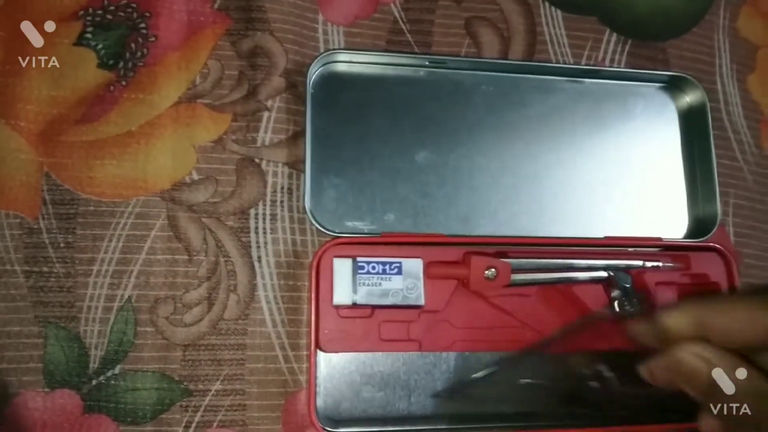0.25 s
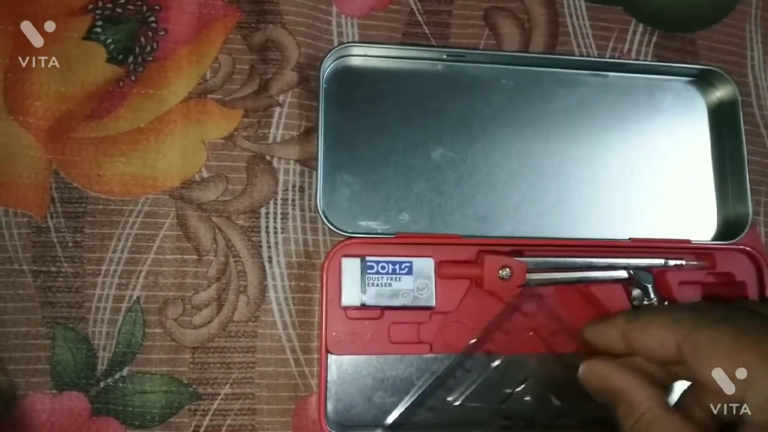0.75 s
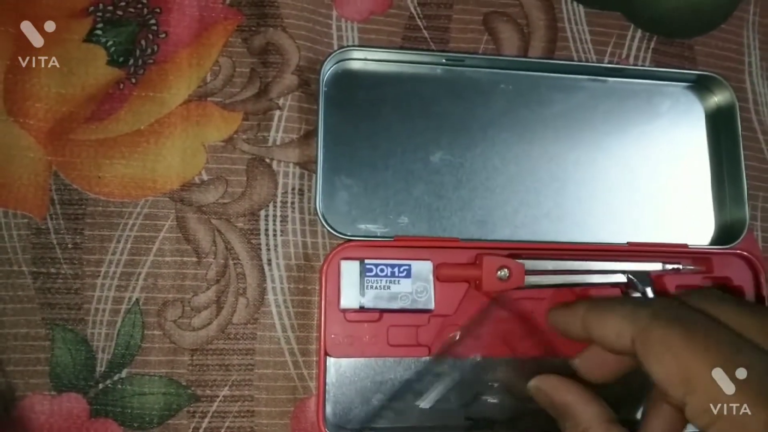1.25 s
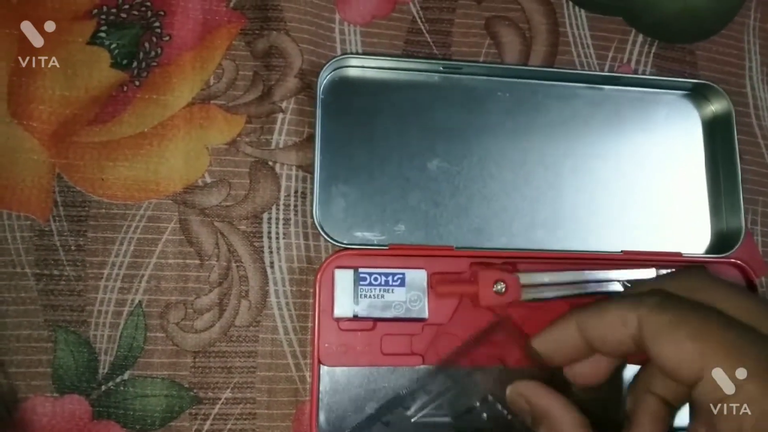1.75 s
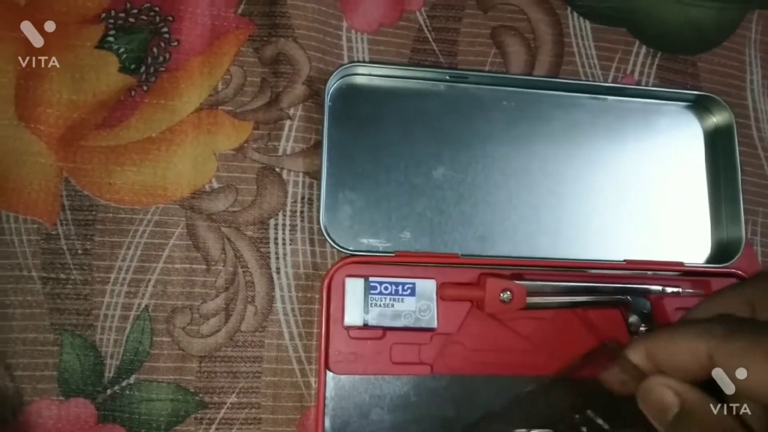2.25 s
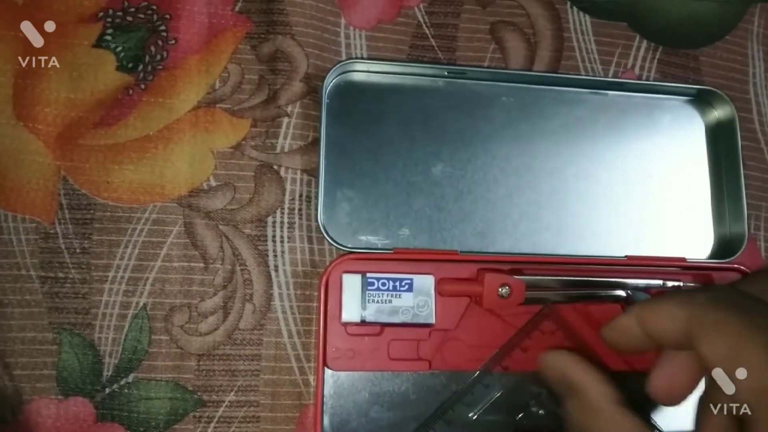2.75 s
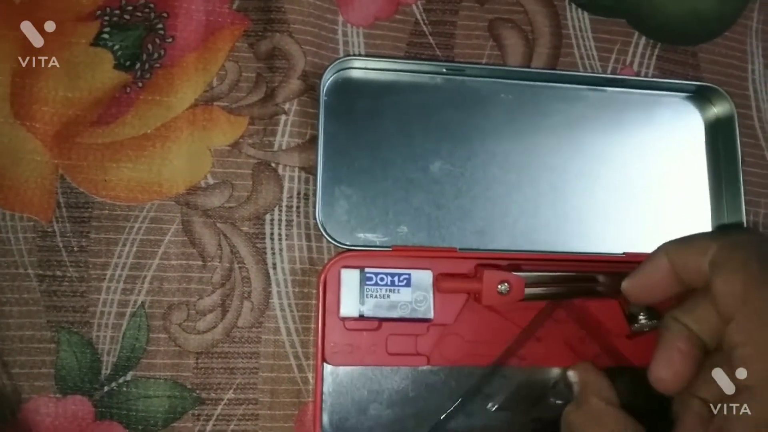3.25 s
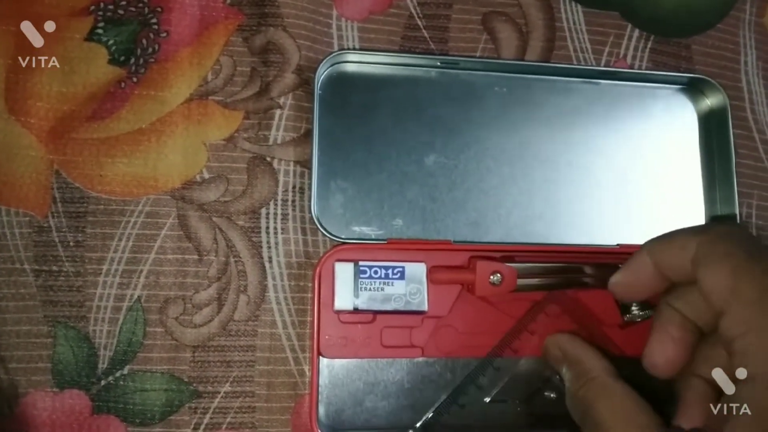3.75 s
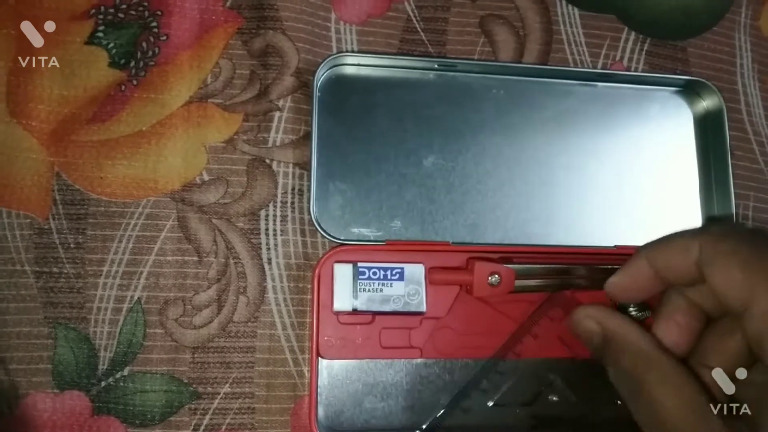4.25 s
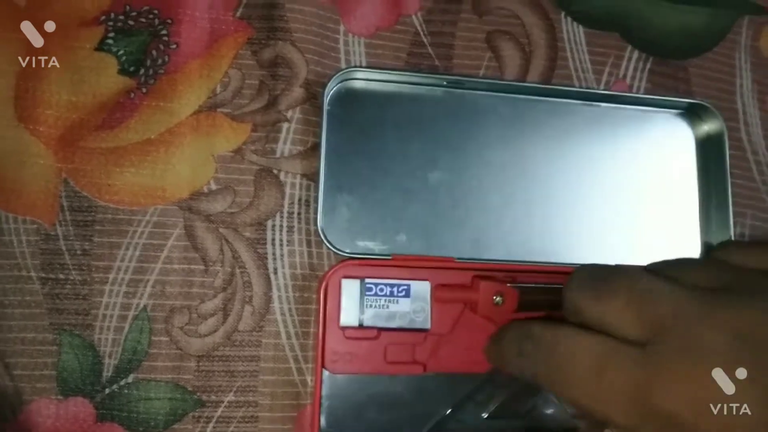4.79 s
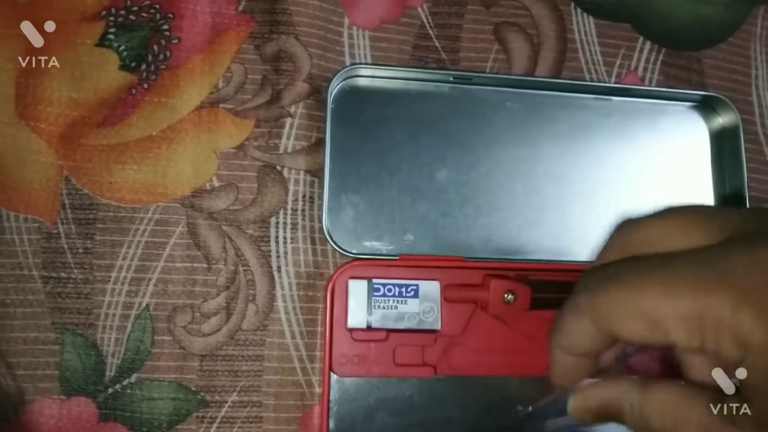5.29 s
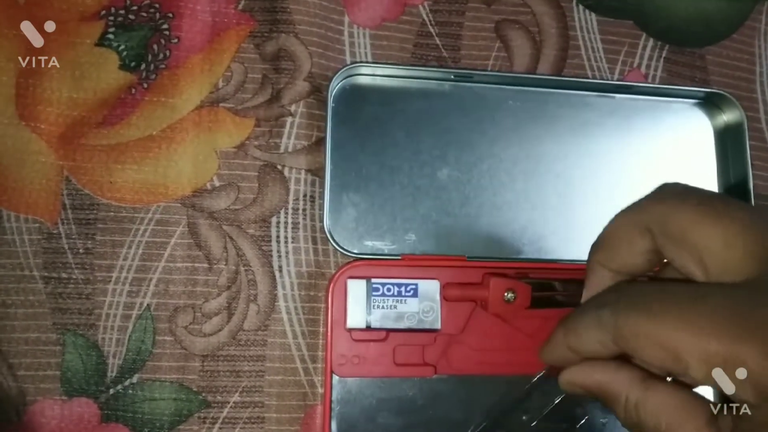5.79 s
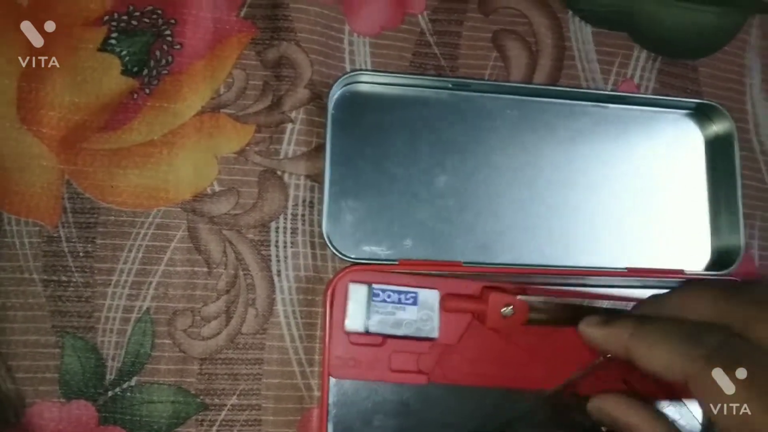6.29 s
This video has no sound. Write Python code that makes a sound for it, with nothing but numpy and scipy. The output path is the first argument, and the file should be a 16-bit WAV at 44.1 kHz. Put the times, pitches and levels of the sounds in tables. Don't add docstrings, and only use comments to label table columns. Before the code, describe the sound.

Close up in a small room, hands fit plastic and steel drawing tools into a plastic tray inside a tin case. Sparse clicks and scrapes come first, then brighter metallic snaps and a brief ringing rattle around two and a half seconds. Further sharp clacks, taps and dragging follow in uneven clusters, fading to light slides. A low fan hum stays underneath, and the high hiss drops away between contacts.

```python
import sys
import numpy as np
from scipy import signal
from scipy.fft import rfft, irfft, next_fast_len
from scipy.io import wavfile
from scipy.ndimage import uniform_filter1d, map_coordinates

SR = 44100
rng = np.random.default_rng(int(sys.argv[2]) if len(sys.argv) > 2 else 0)


def volts_from_db(level):
    exponent = np.asarray(level, float) / 20
    return 10 ** exponent


def output_pcm(signal):
    pcm = np.clip(np.atleast_2d(signal).T, -1, 1) * 32767
    wavfile.write(sys.argv[1], SR, np.round(pcm).astype(np.int16))


N = 287973

# [f/Hz, width/Hz, level/dB]
PLASTIC_MODES = [(1535, 420, 0.5), (1726, 504, -1), (2288, 520, -1.5), (2563, 490, 0), (2980, 370, -0.5),
                 (3360, 630, 1.5), (4115, 1760, -3.5)]
# [f/Hz, width/Hz, level/dB]
STEEL_MODES = [(5350, 810, -8), (5900, 400, -2), (6420, 360, -2), (7537, 670, -1.5), (7580, 790, -7),
               (8450, 410, -12.5), (9830, 880, -12.5), (10630, 530, -13.5), (12150, 850, -27.5),
               (13700, 8300, -27), (15400, 230, -21.5)]
# [f/Hz, likeness/0-1]
PORT_LIKENESS = [(30, 0.11), (70, 1), (300, .93), (600, 0.6), (1200, 0.1), (16000, 0.5)]


def unit(x):
    return x / np.sqrt(np.mean(x ** 2) + 1e-20)


def along(points, hz):
    f, v = np.transpose(points)
    return np.interp(np.log(hz + 1), np.log(f + 1), v)


def curves(rows):
    s, *cols = np.transpose(rows)
    return [np.interp(np.arange(N) / SR, s, c) for c in cols]


def wobble(rate_hz):
    knots = rng.standard_normal(int(N * rate_hz / SR) + 4)
    return map_coordinates(knots, [np.arange(N) * rate_hz / SR])


def filtered(x, response):
    n = x.shape[-1]
    m = next_fast_len(n + 2048)
    return irfft(rfft(x, m) * response(np.fft.rfftfreq(m, 1 / SR)), m)[..., :n]


def modes(table, hz, scatter_db=0, detune=1):
    c, w, db = np.transpose(table)[..., None]
    c = c * np.reshape(detune, (-1, 1))
    sign = (-1) ** np.arange(len(table))[:, None]
    strength = sign * volts_from_db(db + np.reshape(scatter_db, (-1, 1)))
    return np.sum(strength * 1j * hz * w / (c * c - hz * hz + 1j * hz * w), axis=0)


def pair(gain):
    def spread(hz):
        turn = np.arccos(np.clip(along(PORT_LIKENESS, hz), 0, 1)) / 2
        return gain(hz) * [np.cos(turn), np.sin(turn)]

    mid, side = filtered(rng.standard_normal((2, N)), spread)
    return unit(np.array([mid + side, mid - side]))


def background():
    # [t/s, rumble/dB, drone/dB]
    fan = [(0.0, -56, -78), (0.54, -51, -74), (1.85, -55.5, -63.5), (1.95, -45, -84), (2.07, -67.5, -67),
           (2.27, -49.5, -77), (2.8, -55.5, -67), (3.07, -53.5, -57), (3.82, -61, -62.5),
           (5.15, -49.5, -59), (5.2, -63.5, -61), (5.31, -57.5, -82), (5.58, -61.5, -61.5),
           (5.67, -45.5, -69), (6.05, -56, -68.5), (6.33, -52, -62), (6.49, -61, -69), (6.53, -64.5, -56.5)]
    # [f/Hz, width/Hz, level/dB]
    fan_orders = [(97.2, 7.3, 3.5), (79, 16, -6.5), (130.3, 4.2, -2.5), (192.9, 3.5, -9.5)]
    # [f/Hz, width/Hz, level/dB]
    drone_modes = [(246, 38, 2.5), (306, 37, 2), (370.8, 11, -11.5), (500.4, 7, -17), (663, 25, -19)]
    # [f/Hz, density/dB per Hz]
    air_density = [(12, -22), (20, 9), (70, -3.5), (151, -9.5), (297, -25.5), (404, -27), (863, -36.5),
                   (1690, -37), (2310, -32), (3060, -32), (4660, -35), (7300, -38), (15200, -63.5),
                   (16500, -64.5)]
    # [t/s, level/dB]
    pipe = [(0, -100), (4.05, -100), (4.15, -66), (4.9, -65.5), (5.85, -67.5), (6.05, -64.5), (6.25, -88.5)]

    rumble_db, drone_db = curves(fan)
    hum = volts_from_db(rumble_db + 3.0 + 1.3 * wobble(3.7)) * pair(lambda hz: modes(fan_orders, hz))
    drone = volts_from_db(drone_db + 3.0) * pair(lambda hz: modes(drone_modes, hz))
    air = volts_from_db(-48.0) * pair(lambda hz: volts_from_db(along(air_density, hz)))

    whine_hz = 3152 + 4 * wobble(3)
    whine = volts_from_db(curves(pipe)[0] + 1.6 * wobble(5.5)) * np.sin(2 * np.pi * np.cumsum(whine_hz) / SR)
    whine = whine * volts_from_db([[2], [-4]]) * [[1], [-1]]

    flicker = volts_from_db(2.1 * wobble(400) + 3.3 * wobble(25))
    skin = pair(lambda hz: modes(PLASTIC_MODES, hz) + modes(STEEL_MODES, hz))
    rustle = volts_from_db(-74.0) * unit(flicker * skin)
    return hum + drone + air + rustle + whine


def contacts(rows, grain_db, blow, scatter_db, own, focus_db):
    # [from t/s, plastic tilt/dB per octave, thud/dB, steel tilt/dB per octave, left over right/dB]
    grips = [(0, -14, -4, 15, -1), (.33, 0, 5.5, 0.5, 2.5), (.41, -2, 2, 3, -2), (.67, 2, 0, -12, 11),
             (.78, -4, 7, -4, 1.5), (.9, 4, -2, 7, 0), (1.25, -5.5, 2, -19, 1.5), (1.46, -3, 4.5, -4, 3.5),
             (1.6, -1.5, 2, -2, 0.5), (1.7, 10, -10, -9, 1), (1.74, -7.5, 1, -5, 3), (1.78, 0, 2, -4, -1),
             (1.84, 2, -2.5, -2, 1.5), (1.99, -11, 4.5, -9, 2), (2.17, 3.5, 6, 5.5, -1),
             (2.32, 5.5, -6.5, -9, -0.5), (2.42, 7, -1, -8, -1), (2.485, 2.5, 0, 8.5, 1),
             (2.76, 4.5, 5, -8, 4), (2.93, 0, -4.5, -10, 1), (3.02, 5, -4, -7, -1), (3.045, -13, 1.5, 4, 1),
             (3.15, -9, 1.5, -2, 1), (3.28, -5, 3, 6, 1.5), (3.43, -1.5, -6.5, -12, 5),
             (3.67, -6.5, 0, -9, 1.5), (3.8, 2.5, 1, 6.5, 0.5), (4.07, -11, 3, -7.5, 1.5),
             (4.24, 2.5, -4, 2, -0.5), (4.43, 5, -1.5, -3, 2), (4.495, -1.5, 0, -4.5, 1),
             (4.64, 2.5, 4, 7, -0.5), (4.71, 2, 3.5, 5, 1), (4.92, -7, -2, -11, 2),
             (5.075, 11, -0.5, 0, -0.5), (5.21, 4.5, -1.5, 3, 2), (5.49, 4, 0.5, 2, 1),
             (5.69, 5, -0.5, -7, 1.5), (6.1, 2, 1.5, 1.5, 3), (6.38, 2.5, -5, -2, 6)]
    # [f/Hz, width/Hz, level/dB]
    tray_modes = [(160, 95, -2), (208.4, 39, 5), (306, 61, 1.5), (373, 180, 0), (516, 270, -2),
                  (650, 210, -3), (920, 270, -2), (999, 190, -2.5)]
    # [f/Hz, width/Hz, level/dB]
    leg_modes = [(7800, 97, 10), (8700, 44, 9), (9900, 99, -9.5)]
    # [from t/s, to t/s]
    legs_free = (2.495, 2.56)

    size = SR // 5
    out, t = np.zeros((2, N + size)), np.arange(size) / SR
    for s, db, thud_db, steel_db, t60, pitch_hz, rise_ms in rows:
        tilt_db, body_db, edge_db, pan_db = [grip[1:] for grip in grips if grip[0] <= s + .004][-1]
        chance = rng.standard_normal((5, size))

        rise = max(rise_ms, .2) / 1000
        swell = volts_from_db(-14 * (0.5 - t / rise)) * np.minimum(t / (0.0011 + 0.44 * rise), 1)
        chatter = volts_from_db(-60 * (t - rise) / max(t60, .01))
        dying = chatter + blow * volts_from_db(-60 * (t - rise) / 0.0012)
        fine = grain_db * unit(uniform_filter1d(chance[0], size=35))
        coarse = 0.43 * unit(uniform_filter1d(chance[0, ::-1], size=260))
        impacts = chance[1:4] * np.abs(chance[1:4]) ** .7
        force = np.where(t < rise, swell, dying) * volts_from_db(fine + coarse) * impacts
        spread = force[0] + own * force[1:]

        luck_db, detune = scatter_db * chance[4], 1 + 0.037 * chance[4, ::-1]

        def ring(x, table, table_db, k):
            last = k + len(table)

            def response(hz):
                rolloff = (1 + 1j * hz / (1.76 * table[-1][0])) ** 2
                return modes(table, hz, table_db + luck_db[k:last], detune[k:last]) / rolloff

            return filtered(x, response)

        octaves = np.log2(np.transpose(PLASTIC_MODES)[0] / pitch_hz)
        near_db = tilt_db * octaves - focus_db * octaves ** 2
        sheen_db = edge_db * np.log2(np.transpose(STEEL_MODES)[0] / 7000)
        legs_db = 0 if legs_free[0] < s < legs_free[1] else -27
        legs = filtered(spread, lambda hz: modes(leg_modes, hz, legs_db))
        plastic = ring(spread, PLASTIC_MODES, near_db, k=0)
        steel = ring(spread, STEEL_MODES, sheen_db, k=20) + legs

        soft = volts_from_db(-60 * np.maximum(t - rise, 0) / 0.31)
        shared = force[0] + .13 * force[1:]
        tray = ring(shared * soft, tray_modes, 0, k=40)

        top = lambda x: np.sqrt(uniform_filter1d(np.mean(x ** 2, 0), size=110).max())
        click = plastic / top(plastic) + volts_from_db(steel_db - 3.5) * steel / top(steel)
        click = volts_from_db([[pan_db / 2], [-pan_db / 2]]) * click / top(click)
        thud = volts_from_db(thud_db + body_db + 3.0) * tray / top(tray)
        out[:, round(s * SR):][:, :size] += volts_from_db(db) * (click + thud)
    return out[:, :N]


def blows(table, thud_db, plastic_hz, octaves_per_db):
    rows = [(s, db, thud_db, steel_db, t60, plastic_hz * 2 ** (octaves_per_db * steel_db), 1.1)
            for s, db, t60, steel_db in table]
    return contacts(rows, grain_db=2.5, blow=0.11, scatter_db=2.0, own=1.0, focus_db=6.0)


def scuffs(table, thud_db, steel_db):
    rows = [(s, db, thud_db, steel_db, t60, 2600, rise_ms) for s, db, t60, rise_ms in table]
    return contacts(rows, grain_db=3.0, blow=.1, scatter_db=2.0, own=0.87, focus_db=5.5)


def ticks():
    # [t/s, level/dB, chatter t60/s, steel over plastic/dB]
    tick_table = [(.0005, -41.5, 0.0043, -5), (1.677, -59, 0.025, -4), (2.004, -52, 0.018, -8.5),
                  (2.884, -51.5, .015, -3), (2.986, -39, .02, 11.5), (3.081, -39, 0.042, 1),
                  (5.023, -47, 0.017, -13), (4.458, -42.5, 0.033, -1), (4.583, -47, 0.013, -4)]
    rows = [(s, db, -12, steel_db, t60, 2500, .4) for s, db, t60, steel_db in tick_table]
    return contacts(rows, grain_db=-1, blow=.5, scatter_db=4.5, own=.8, focus_db=9)


def rings():
    # [t/s, peak/dB, f/Hz, t60/s]
    pings = [(0.3476, -31, 3750, 0.02), (0.3508, -26.5, 3040, 0.02), (0.3583, -43, 5340, 0.016),
             (0.3626, -37, 7600, 0.039), (0.9635, -25, 9930, 0.02), (0.9635, -26, 4000, 0.017),
             (0.9642, -29, 8110, 0.023), (0.9654, -25.5, 6460, 0.03), (1.7718, -34, 4900, 0.016),
             (1.7907, -28, 3200, 0.045), (1.7907, -24, 7400, 0.015), (1.792, -24, 1300, 0.037),
             (1.9264, -32, 860, 0.023), (1.9264, -32, 3600, 0.018), (2.22, -34, 2970, 0.016),
             (2.2225, -38, 5930, 0.045), (2.3451, -14, 6630, 0.018), (2.3458, -22, 5100, 0.03),
             (2.3467, -22, 2930, 0.02), (2.4924, -27, 3570, 0.016), (2.512, -21, 7330, 0.023),
             (2.5308, -24, 7250, 0.045), (2.5374, -37.5, 6530, 0.05), (2.9687, -37, 5810, 0.016),
             (2.987, -36, 7000, 0.016), (3.0511, -23.5, 460, 0.015), (3.0598, -37, 6200, 0.018),
             (3.3152, -34, 2230, 0.016), (3.3165, -31.5, 3310, 0.019), (3.7187, -42.5, 2880, 0.016),
             (4.103, -36.5, 7110, 0.016), (4.256, -26, 7050, 0.03), (4.289, -29, 5730, 0.016),
             (4.5048, -33, 1450, 0.042), (4.5227, -24, 880, 0.017), (4.6562, -36.5, 1715, 0.042),
             (4.6569, -36, 3540, 0.016), (5.0009, -40, 6400, 0.016), (5.0074, -41, 6800, 0.03),
             (5.0099, -35, 1720, 0.045), (5.1077, -23, 3360, 0.021), (5.1083, -26, 6130, 0.018),
             (5.1107, -24, 3970, 0.019), (5.1105, -26.5, 5500, 0.037), (5.2299, -34, 3150, 0.045),
             (5.2599, -34, 5270, 0.031), (5.5184, -44, 3210, 0.02), (6.1816, -48, 7220, 0.03),
             (6.2381, -49, 9280, 0.016), (6.2577, -40, 5570, 0.045)]
    # [t/s, peak/dB, centre f/Hz]
    cracks = [(.4315, -36, 700), (1.7452, -25.5, 1500), (1.766, -19, 2500), (1.7696, -19, 1200),
              (1.91, -27, 3000), (1.9268, -27, 1980), (2.2218, -27.5, 1510), (2.492, -15.5, 2500),
              (3.051, -11, 2500), (3.308, -32.5, 400), (3.7195, -29, 1186), (3.813, -34, 1815),
              (4.105, -28.5, 2500), (4.449, -31, 1500), (4.5053, -18, 2970), (4.523, -24, 1500),
              (4.658, -26, 3000), (4.7205, -29, 2500), (5.1085, -16, 4000), (5.1109, -17.5, 1980),
              (5.23, -27, 2000), (5.516, -36, 2480), (5.708, -37, 1203), (6.2362, -28, 3000)]
    # [f/Hz, lead/rad]
    port_lead = [(200, 0), (1500, .3), (3150, 1.9), (4700, 3.5), (6300, 5.1), (6880, 5.1), (6900, 7.8)]
    ping_rise_s, crack_cycles = .0004, 2.5

    rows = [(*row, ping_rise_s) for row in pings]
    rows += [(s, db, hz, crack_cycles / hz, 1 / SR) for s, db, hz in cracks]
    out, t = np.zeros((2, N + SR)), np.arange(SR // 10) / SR
    for s, db, hz, t60, rise_s in rows:
        phase = 2 * np.pi * hz * t + np.array([[0], [along(port_lead, hz)]])
        decay = volts_from_db(db - 60 * t / max(t60, 1 / SR))
        out[:, round(s * SR):][:, :len(t)] += decay * np.sin(phase) * (1 - np.exp(-t / rise_s))
    return out[:, :N]


def clicks():
    # [t/s, level/dB, chatter t60/s, steel over plastic/dB]
    click_table = [(0.3489, -31, 0.055, -3), (0.9636, -24, 0.062, 9), (1.7902, -18, 0.014, -3.5),
                   (2.1803, -52.5, 0.79, -8), (2.2195, -31, 0.066, 1), (2.3275, -31, 0.17, -1),
                   (2.3342, -41.5, 0.072, 1), (2.3447, -14.5, 0.024, 11), (2.3505, -27, 0.016, 11.5),
                   (2.4915, -18, 0.01, 11), (2.4985, -29, 0.023, 10), (2.5131, -29.5, 0.096, 10),
                   (2.5299, -24, 0.051, 9.5), (2.5435, -29, 0.084, 8), (3.0501, -17.5, 0.045, 7),
                   (3.1671, -48.5, 0.25, 0.5), (3.3151, -29.5, 0.053, 3), (3.7173, -32.5, 0.026, -1.5),
                   (3.8121, -33.5, 0.047, 0.5), (4.249, -22.5, 0.13, 4), (4.278, -28, 0.058, 2),
                   (4.6558, -30.5, 0.12, -0.5), (5.24, -31, 0.063, -6.5), (6.2357, -31, 0.17, 0),
                   (6.527, -32.5, 0.027, -6)]
    return blows(click_table, thud_db=-20.5, plastic_hz=3070, octaves_per_db=0.0033)


def scrapes():
    # [t/s, level/dB, chatter t60/s, rise/ms]
    scrape_table = [(0.3565, -47, 0.22, 8), (0.362, -34.5, 0.097, 20.5), (2.2041, -39.5, 0.18, 16.3),
                    (2.4381, -44, 0.12, 13), (2.5522, -47, 0.015, 9.1), (2.5883, -68, 0.19, 4),
                    (2.8415, -45, 0.15, 24), (2.9543, -39, 0.23, 20), (2.9768, -41.5, 0.057, 23),
                    (3.1868, -48, 0.048, 10), (3.8183, -36, 0.11, 9.3), (4.3216, -65, 0.16, 14),
                    (4.449, -42.5, 0.095, 9.9), (5.139, -52, 1, 20), (5.6466, -53.5, 0.15, 7.9),
                    (5.762, -41.5, 0.081, 35), (6.169, -43.5, 0.18, 7.7), (6.2165, -56, 0.12, 8.1),
                    (6.495, -32.5, 0.29, 71)]
    return scuffs(scrape_table, thud_db=-16, steel_db=2.5)


def drags():
    # [t/s, level/dB, chatter t60/s, rise/ms]
    drag_table = [(0.416, -49, 0.076, 13), (0.543, -66, 0.12, 6), (1.265, -46.5, 0.25, 13.5),
                  (1.6495, -51.5, 0.18, 15.5), (1.6844, -49, 0.12, 22), (2.0021, -56.5, 0.045, 7.4),
                  (2.0598, -58.5, 0.0077, 3.6), (2.0698, -53, 0.0081, 20), (3.0308, -41, 0.35, 3),
                  (4.1411, -60, 0.45, 13), (4.7793, -69, 0.065, 4.9), (5.0515, -45.5, 0.78, 8.6),
                  (5.7132, -57.5, 0.81, 11), (6.1197, -60, 0.098, 7), (6.3161, -50, 0.053, 25)]
    return scuffs(drag_table, thud_db=0.35, steel_db=-9)


def taps():
    # [t/s, level/dB, chatter t60/s, steel over plastic/dB]
    tap_table = [(0.685, -59.5, 0.023, 19), (0.8075, -49, 0.12, -9.5), (0.816, -54, 0.1, -1),
                 (1.619, -45, 0.093, 0), (1.7111, -50, 0.085, -0.5), (1.7273, -44, 0.082, -4),
                 (1.7462, -36, 0.04, -11.5), (1.7977, -28.5, 0.055, -12.5), (1.9094, -36, 0.088, -6),
                 (1.9276, -36.5, 0.15, -5), (2.9485, -32, 0.032, 1.5), (3.2897, -36, 0.061, -6),
                 (4.1035, -33.5, 0.13, -2.5), (4.1344, -42, 0.057, -42), (4.5057, -27.5, 0.027, 3),
                 (4.521, -30.5, 0.11, -5), (4.7215, -39, 0.083, 1.5), (4.7747, -40.5, 0.0077, -39),
                 (4.9545, -47, 0.026, -34), (4.998, -37, 0.18, -12), (5.0834, -42.5, 0.029, -14.5),
                 (5.108, -24.5, 0.035, 4), (5.23, -33.5, 0.17, -3.5), (5.2611, -34, 0.036, -10),
                 (5.5155, -42.5, 0.21, -2), (5.5618, -39.5, 0.086, -11), (5.6679, -47, 0.048, -3),
                 (6.2984, -39.5, 0.2, -9)]
    return blows(tap_table, thud_db=-9, plastic_hz=2430, octaves_per_db=0.022)


def knocks():
    # [t/s, level/dB, chatter t60/s, steel over plastic/dB]
    knock_table = [(0.794, -49.5, 0.1, -11.5), (1.291, -37.5, 0.044, -1), (1.4754, -63, 0.21, -3),
                   (1.5032, -54, 0.045, -25), (1.6728, -52.5, 0.28, -19), (1.7653, -26.5, 0.17, -4),
                   (3.4435, -37.5, 0.017, 3), (4.4476, -40.5, 0.15, -10), (4.9323, -46, 0.044, -3),
                   (4.9783, -49, 0.29, -8), (4.9893, -42.5, 0.18, -4), (5.7061, -47, 0.018, -13),
                   (5.9082, -58, 0.03, -5.5), (6.3942, -54.5, 0.045, 3.5)]
    return blows(knock_table, thud_db=-2.1, plastic_hz=2900, octaves_per_db=.015)


def slides():
    # [t/s, level/dB, chatter t60/s, rise/ms]
    slide_table = [(0.915, -47, 0.5, 29), (0.95, -38, 0.15, 8.7), (1.8496, -42, 0.67, 23.5),
                   (1.8783, -39.5, 0.26, 31.5), (2.2634, -52, 0.08, 17), (2.8156, -43.5, 0.24, 11.9),
                   (2.8722, -46.5, 0.047, 12), (3.2086, -52.5, 1, 4.9), (3.449, -51, 0.064, 8.3),
                   (3.461, -49, 0.059, 3.7), (3.7282, -36, 0.11, 13), (4.5682, -51, 0.32, 13),
                   (4.7373, -42.5, 0.13, 9.4), (5.0023, -41, 0.055, 23), (5.0164, -33.5, 0.084, 9.6),
                   (5.3676, -70, 0.27, 12), (5.4572, -61, 0.23, 17), (6.1868, -43.5, 0.11, 15.5),
                   (6.2794, -43, 0.15, 29)]
    return scuffs(slide_table, thud_db=-9, steel_db=-5)


def bumps():
    # [t/s, level/dB, chatter t60/s]
    bump_table = [(1.582, -78, 0.042), (2.7777, -58.5, 0.038), (3.2472, -60, 0.032), (3.681, -70, 0.022),
                  (3.7068, -50.5, 0.3), (4.088, -56, 0.4), (6.21, -50, 0.22)]
    steel_db = -2
    rows = [(*row, steel_db) for row in bump_table]
    return blows(rows, thud_db=7.6, plastic_hz=2200, octaves_per_db=.01)


def room(x):
    # [f/Hz, t60/s]
    decay_t60 = [(200, 0.14), (2000, 0.19), (7000, 0.15), (14000, 0.26)]
    out = np.zeros((2, N))
    for k in range(3):
        hz, t, z = signal.stft(rng.standard_normal((2, SR // 3)), SR, nperseg=256)
        alike = np.clip(along(PORT_LIKENESS, hz), 0, 1)[:, None]
        z[1] = alike * z[0] + np.sqrt(1 - alike ** 2) * z[1]
        tail = signal.istft(z * volts_from_db(-60 * t / along(decay_t60, hz)[:, None]), SR, nperseg=256)[1]
        tail = tail / np.linalg.norm(tail[0])
        turn = np.arange(N) * 5 // SR % 3 == k
        late = np.pad(x * turn, ((0, 0), (200, 0)))
        out += signal.fftconvolve(late, tail, axes=1)[:, :N]
    return out


def scene():
    near = clicks() + taps() + knocks() + bumps()
    near = near + scrapes() + slides() + drags()
    near = near + ticks() + rings()
    return near + volts_from_db(-8.0) * room(near) + background()


def suppress(x, patchy_db):
    # [shuts t/s, opens t/s, depth/dB]
    shut = [(-.004, 0.217, -23), (0.509, 0.535, -21.5), (0.574, 0.674, -22.5), (0.72, 0.79, -26),
            (0.864, 0.887, -20), (1.093, 1.247, -22.5), (1.371, 1.466, -21), (1.519, 1.605, -17),
            (2.123, 2.157, -27), (2.664, 2.782, -22.5), (3.417, 3.44, -23), (3.516, 3.697, -26.5),
            (3.912, 4.07, -27.5), (5.863, 5.899, -25.5), (5.929, 6.074, -23), (6.304, 6.407, -10),
            (6.416, 6.462, -20.5)]
    # [f/Hz, share/0-1]
    depth_share = [(150, 0), (500, 0.06), (800, 0), (1200, 0.92), (16000, 1)]
    shutting_s, opening_s = 0.037, 0.034

    hz, t, z = signal.stft(x, SR, nperseg=512, noverlap=384)
    depth_db = 0
    for shuts, opens, db in shut:
        ramp = np.minimum((t - shuts) / shutting_s, (opens - t) / opening_s)
        depth_db = depth_db + db * np.clip(.5 + ramp, 0, 1)

    power = np.mean(np.abs(z) ** 2, 0)
    level_db = uniform_filter1d(10 * np.log10(power + 1e-20), size=40, axis=1)
    tone_db = level_db - uniform_filter1d(level_db, size=15, axis=0)
    spared = np.clip((tone_db - 7) / 8, 0, .33)
    share = np.clip(along(depth_share, hz), 0, 1)[:, None] * (1 - spared)

    field = uniform_filter1d(rng.standard_normal(share.shape), size=9, axis=0)
    field = uniform_filter1d(field, size=14, axis=1)
    gain = (hz[:, None] < 16350) * volts_from_db(share * (depth_db + patchy_db * unit(field)))
    return signal.istft(z * gain, SR, nperseg=512, noverlap=384)[1][:, :N]


def top_cut(x):
    return signal.sosfilt(signal.butter(12, 16500, fs=SR, output="sos"), x)


def record(dry):
    left = lambda hz: 1 + modes([(1400, 540, -11.5), (7120, 450, 13)], hz)
    lag = lambda hz: np.exp(-2j * np.pi * np.minimum(hz / 6300, 1))
    right = lambda hz: volts_from_db(0.46) * (1 + modes([(2896, 780, -0.68)], hz)) * lag(hz)
    band = lambda hz: hz ** 2 / (hz ** 2 + 30 ** 2) / (1 + (hz / 15900) ** 90)
    ports = filtered(dry, lambda hz: np.array([left(hz), right(hz)]) * band(hz))
    ports = ports / (1 + np.abs(ports / .7) ** 3) ** (1 / 3)
    mix = suppress(ports, patchy_db=2.5)
    return top_cut(mix)


dry = scene()
out = record(dry)
output_pcm(out)
```